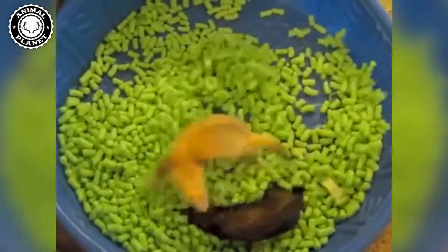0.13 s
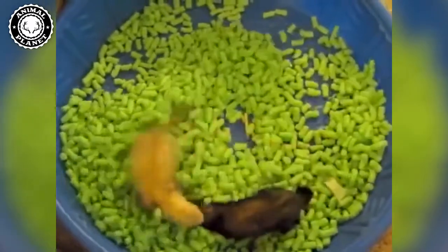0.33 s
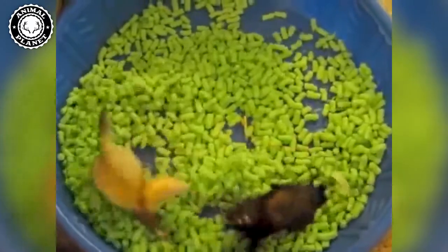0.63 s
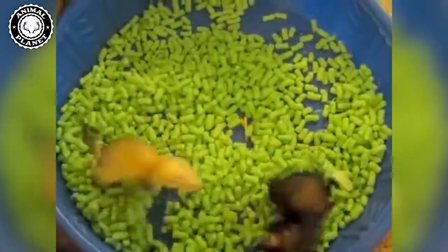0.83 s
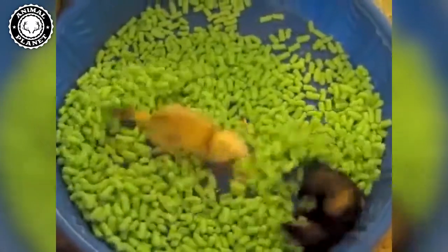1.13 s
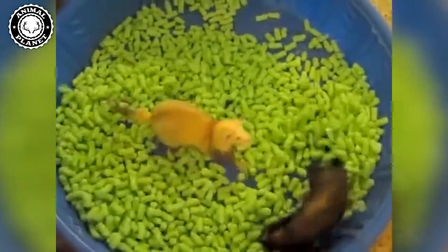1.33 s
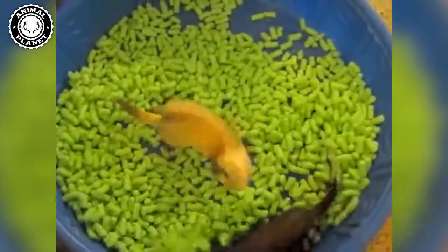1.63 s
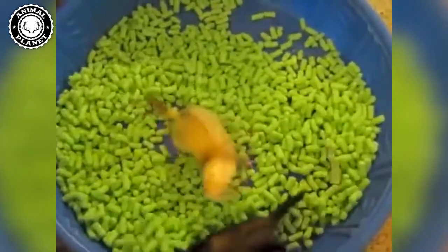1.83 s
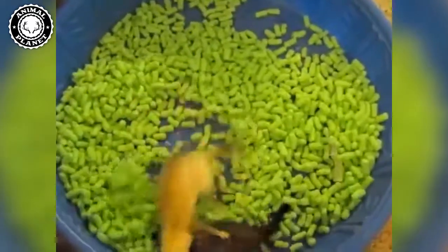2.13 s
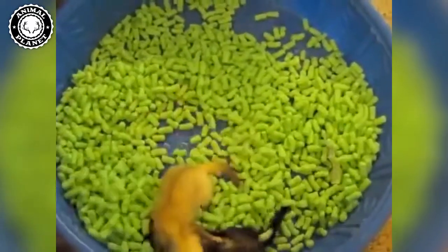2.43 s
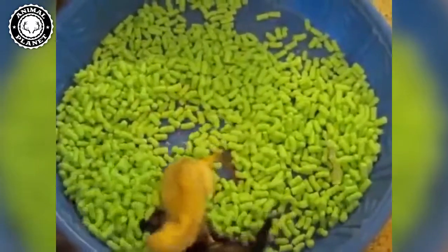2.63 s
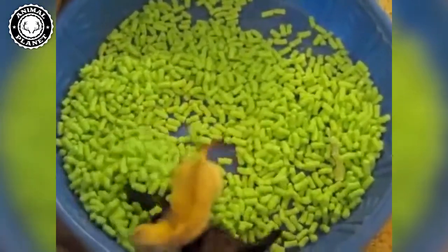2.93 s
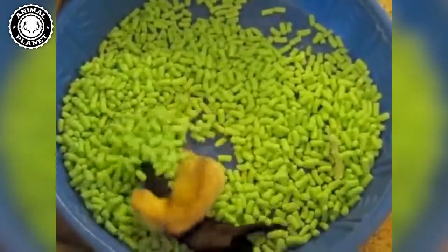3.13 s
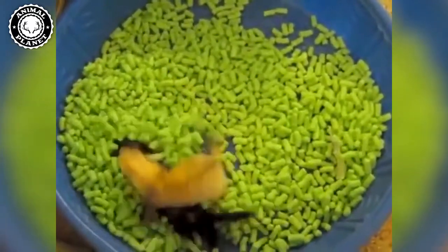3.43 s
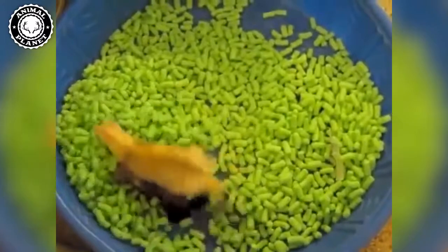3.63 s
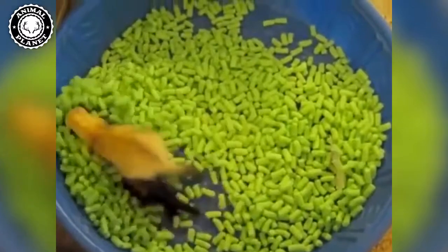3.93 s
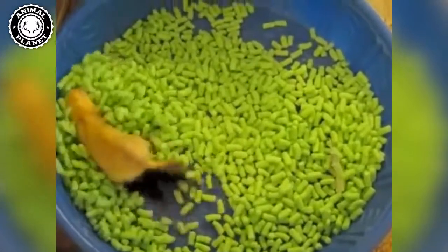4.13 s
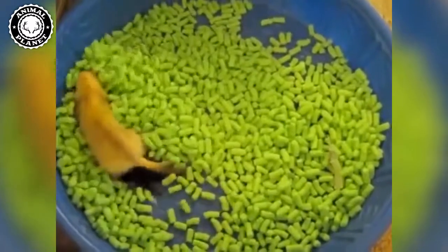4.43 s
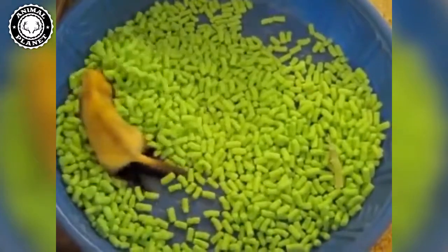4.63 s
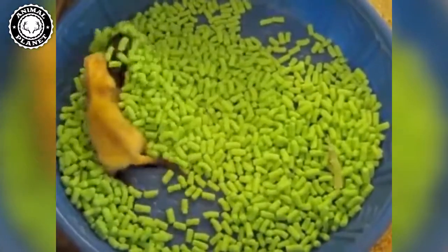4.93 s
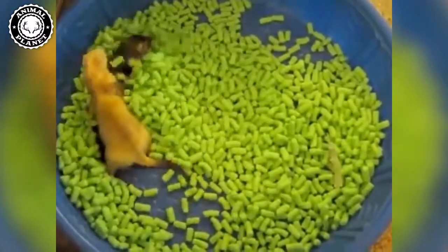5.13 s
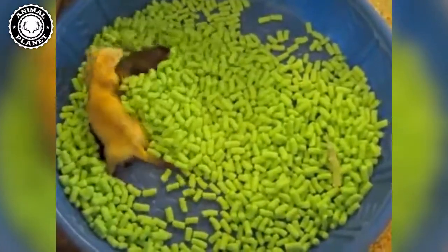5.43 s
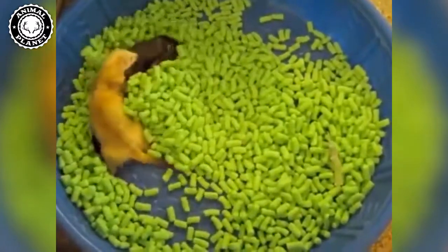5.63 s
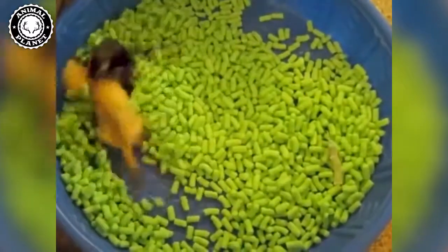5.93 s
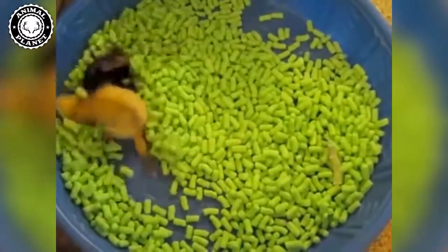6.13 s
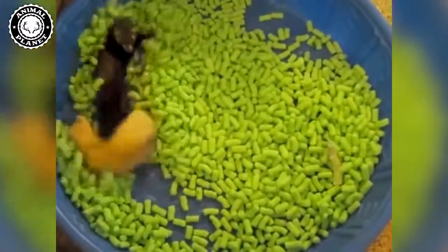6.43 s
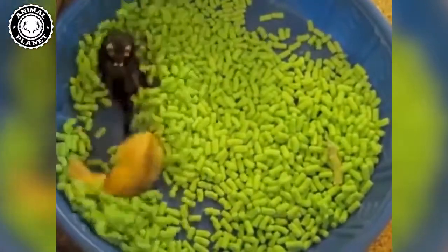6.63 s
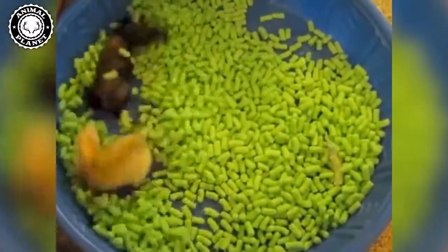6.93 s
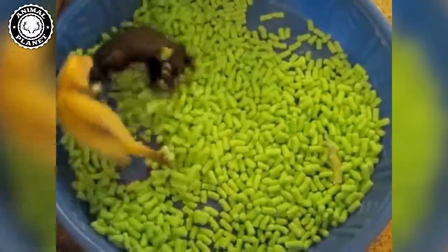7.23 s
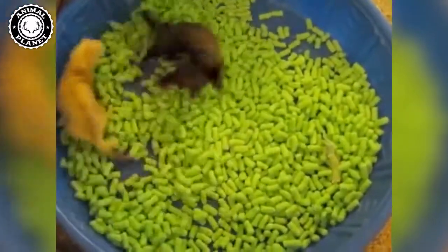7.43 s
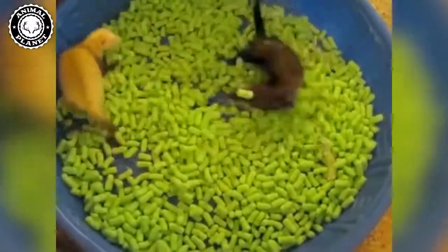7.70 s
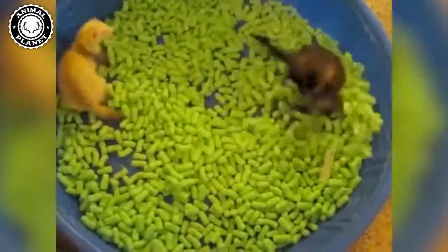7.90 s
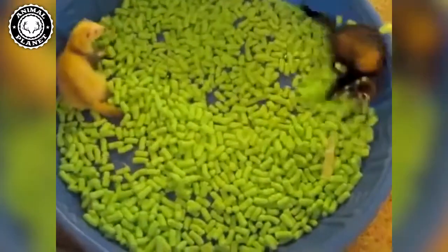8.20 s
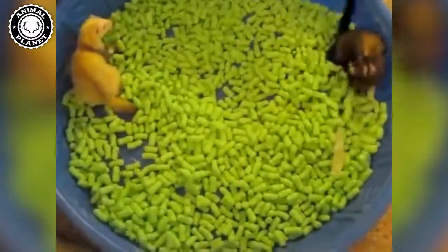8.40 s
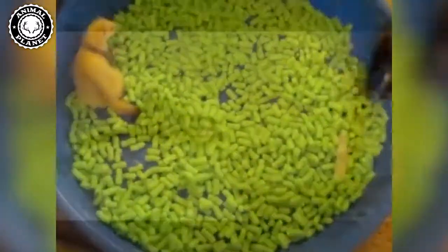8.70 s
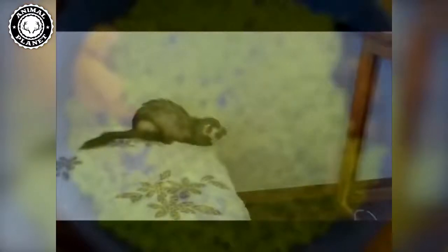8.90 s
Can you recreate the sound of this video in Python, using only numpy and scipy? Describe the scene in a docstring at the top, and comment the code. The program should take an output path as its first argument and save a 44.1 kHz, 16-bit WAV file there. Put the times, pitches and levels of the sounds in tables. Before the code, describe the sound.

Close-up foam rustling: bright dry scraping over hollow light tumbling, pushed in uneven bursts by scrambling ferrets. Early strong knocks and small squeaks give way to crackly burrowing, then heavier bumps on the plastic tub midway, more scrambling and a short rub along the wall near the end. Small room with a short reverb, limited treble, faint rumble, and finally faint hum and hiss. No animal calls.

```python
"""In a small room, two ferrets scramble and burrow through foam packing peanuts in a plastic tub.
Dense grains of noise and short rings make the scraping and tumbling heap; pushes and brief halts shape its level.
Over it come hollow taps of damped modes, crackling runs of slips, gliding squeaks, a rub along the wall,
and landings that boom on the tub's floor and rattle its wall. A short noise-tail reverb surrounds it all.
At the very end a low hum, a low drone and hiss fade in."""
import sys
import numpy as np
from scipy import signal
from scipy.fft import rfft, irfft, next_fast_len
from scipy.io import wavfile
from scipy.ndimage import uniform_filter1d, map_coordinates

SR = 44100
rng = np.random.default_rng(int(sys.argv[2]) if len(sys.argv) > 2 else 0)


def store_wav(level_fs):
    """Save 16-bit WAV to argv[1]."""
    pcm = np.round(np.clip(np.atleast_2d(level_fs), -1, 1) * 32767)
    wavfile.write(sys.argv[1], SR, pcm.T.astype(np.int16))


N = 399546

# peanuts kicked against their neighbours or the tub: (time [s], level [dB], pitch [Hz])
KICKS = [(0.034, -20, 1080), (0.286, -9, 1035), (0.3, -10, 1065), (0.363, -13.5, 930), (0.389, -8, 1080),
         (0.595, -17, 940), (0.711, -19, 1015), (0.73, -24, 970), (0.801, -19, 930), (0.897, -20.5, 1150),
         (1.02, -14.5, 650), (1.046, -18, 527), (1.081, -14, 736), (1.101, -11.5, 920), (1.106, -16, 1060),
         (1.128, -20, 880), (1.181, -18, 644), (1.432, -29, 1150), (1.871, -27, 1370), (2.018, -21.5, 960),
         (2.132, -20, 895), (2.14, -15, 810), (2.15, -15, 700), (2.179, -14.5, 1000), (2.195, -16.5, 810),
         (2.228, -16, 890), (2.238, -17, 1150), (2.247, -17, 980), (2.41, -17.5, 1020), (2.614, -14, 1260),
         (2.666, -16.5, 810), (2.734, -24, 726), (3.071, -18.5, 1116), (3.206, -20.5, 1320),
         (3.383, -13.5, 1136), (3.545, -15, 1130), (3.711, -17, 1110), (3.93, -15, 1040),
         (4.025, -16, 1100), (4.082, -15, 574), (4.244, -32, 920), (4.334, -23.5, 689),
         (4.602, -11.5, 1410), (4.706, -17.5, 1400), (4.837, -25.5, 870), (5.143, -22.5, 800),
         (5.316, -23, 1030), (5.497, -18, 1196), (5.723, -16, 514), (5.977, -11.5, 1300),
         (6.122, -18.5, 640), (6.18, -25, 900), (6.438, -26, 610), (6.502, -23, 781), (6.916, -18, 1020),
         (7.031, -14.5, 1100), (7.04, -13.5, 945), (7.247, -19, 910), (7.354, -15, 625), (7.58, -19, 1280),
         (7.603, -18, 1260), (7.653, -22.5, 1230), (7.805, -22, 1320), (7.888, -21.5, 1230),
         (7.997, -20, 756), (8.012, -16, 935), (8.358, -29, 948), (8.476, -17, 1290), (8.512, -15, 1240),
         (8.694, -19, 524), (8.71, -29, 1280), (8.747, -19, 1290), (8.893, -24, 960)]
# foam sticks and slips, in a tick or a longer crunch: (time [s], level [dB], pitch [Hz], length [s])
STICK_SLIPS = [(0.004, -19, 3590, 0.0057), (0.1141, -18, 1710, 0.028), (0.2527, -20, 3250, 0.0072),
               (0.388, -22, 3280, .006), (0.4604, -22, 2630, 0.0099), (0.731, -27, 3330, 0.0022),
               (0.895, -18.5, 2400, 0.016), (1.047, -16.5, 1770, 0.0095), (1.181, -19, 3400, .002),
               (1.2561, -15, 2700, 0.0024), (1.285, -19, 3820, 0.0023), (1.4355, -25.5, 2830, 0.0089),
               (1.464, -24.5, 4830, 0.0066), (1.642, -20, 3200, 0.0037), (1.669, -16, 3230, 0.0023),
               (1.794, -22, 2620, 0.0049), (1.8698, -12.5, 1970, 0.0025), (1.8965, -20, 4230, 0.0035),
               (1.9114, -22.5, 3310, 0.0041), (2.153, -21, 4000, 0.0086), (2.2594, -27, 4450, .006),
               (2.4109, -23, 4660, .005), (2.4717, -23, 4260, 0.0036), (2.484, -21, 3890, 0.0036),
               (2.5309, -20, 3400, .005), (2.6155, -17.5, 2800, 0.012), (2.6657, -22.5, 3500, 0.0063),
               (2.9204, -22, 4640, 0.0055), (2.9344, -20, 4540, 0.0027), (2.9937, -21, 4370, 0.0063),
               (3.02, -20, 4200, .001), (3.1638, -22, 5300, 0.0014), (3.1981, -20, 4030, 0.009),
               (3.527, -15, 3300, 0.0032), (3.714, -22, 2760, 0.0044), (3.7793, -16.5, 3200, 0.0014),
               (3.802, -24, 3460, .001), (3.9308, -19.5, 3180, 0.0061), (4.0255, -17, 3670, 0.0036),
               (4.4298, -24, 3200, 0.0044), (4.535, -17, 3130, 0.0067), (4.552, -19, 2650, 0.0046),
               (4.6024, -27, 1890, .002), (4.6743, -23.5, 2460, .005), (4.7051, -13, 2100, 0.0043),
               (4.7118, -14.5, 4300, 0.0031), (4.838, -24, 1830, 0.011), (5.003, -20, 4000, 0.0018),
               (5.165, -23, 4200, 0.0086), (5.237, -21, 3400, 0.0063), (5.2985, -17.5, 3780, 0.003),
               (5.3065, -21, 4300, .002), (5.3154, -18, 3000, 0.0025), (5.3707, -22, 4480, .002),
               (5.4665, -19, 2870, 0.0058), (5.4945, -14.5, 3450, 0.0038), (5.504, -14.5, 2860, 0.009),
               (5.5777, -23, 3070, 0.011), (5.7601, -19.5, 3750, 0.021), (5.866, -18, 2950, 0.012),
               (5.931, -21, 3800, .005), (6.054, -19.5, 2930, 0.0054), (6.1805, -14, 2900, .003),
               (6.4186, -16.5, 4050, 0.0035), (6.4556, -20.5, 3660, 0.0045), (6.4994, -24, 3240, 0.0033),
               (6.661, -22.5, 3050, 0.0031), (6.74, -26, 2770, .006), (6.8886, -16, 3300, 0.0087),
               (6.914, -17.5, 3780, 0.0069), (7.0424, -21.5, 3700, 0.012), (7.19, -17, 2760, 0.0043),
               (7.2454, -17, 3360, 0.0034), (7.388, -13, 2940, 0.0064), (7.601, -16, 2500, 0.0097),
               (7.722, -22, 3880, 0.0033), (7.93, -23, 2560, 0.0076), (7.9993, -18, 2400, 0.0029),
               (8.0134, -20, 4170, 0.002), (8.0681, -21, 2980, 0.0089), (8.1519, -20, 2030, 0.013),
               (8.287, -19, 2200, 0.0076), (8.2966, -17, 2300, 0.0097), (8.3584, -20.5, 1970, 0.0026),
               (8.477, -25, 2810, .004), (8.5044, -21, 2940, 0.0057), (8.7485, -15, 2380, 0.002),
               (8.86, -22.5, 2720, 0.012), (8.9024, -24, 2080, 0.002)]
# a body lands and scrabbles for a hold: (time [s], level [dB], scrabbling [s], floor over wall [dB])
LANDINGS = [(0.379, -39, 0.049, 9), (0.74, -41, 0.04, 8.5), (1.078, -30, 0.13, 3), (1.769, -33.5, .03, -5),
            (3.771, -36, 0.024, 5), (3.983, -36, .03, 2), (4.08, -23.5, 0.046, -6), (5.714, -21, 0.05, 0),
            (5.995, -22.5, .06, 6), (6.105, -25, 0.024, 7.5), (6.156, -26, 0.011, -7),
            (6.25, -29, 0.06, -7), (6.567, -33.5, 0.25, -9), (7.049, -32.5, 0.13, 4.5),
            (7.353, -46, 0.031, 15), (8.151, -32, 0.082, 6), (8.714, -29, .06, 1)]
# colour of a soft blow through foam: (frequency [Hz], level [dB])
SOFT_BLOW = [(40, -36.5), (75, -7), (100, -5), (140, 2), (300, -3.5), (700, 2), (1500, -33)]

FLOOR_HZ, FLOOR_WIDTH_HZ = 117.1, 31  # the drum mode of the tub's floor
SAG_DB_PER_S = 0.5  # a push slackens while it lasts


def amp(db):
    """Decibels to gain."""
    return 10 ** (np.asarray(db) / 20)


def unit(x):
    """Scaled to rms 1."""
    return x / np.sqrt(np.mean(x ** 2) + 1e-20)


def along(points, hz):
    """(Hz, value) points, interpolated on a log frequency axis."""
    f, v = np.transpose(points)
    return np.interp(np.log(hz + 1), np.log(f + 1), v)


def curves(rows):
    """One value per sample for each column after the time."""
    s, *cols = np.transpose(rows)
    return [np.interp(np.arange(N) / SR, s, c) for c in cols]


def add(track, s, sound):
    """Mix a sound into a track from time s on."""
    part = track[max(round(s * SR), 0):][:len(sound)]
    part += sound[:len(part)]


def filtered(x, response):
    """x times a complex response of frequency."""
    size = next_fast_len(len(x) + SR // 4)
    spectrum = rfft(x, size) * response(np.fft.rfftfreq(size, 1 / SR))
    return irfft(spectrum, size)[:len(x)]


def coloured(x, spectrum):
    """x through a spectrum of (Hz, dB) points, at rms 1."""
    return unit(filtered(x, lambda hz: amp(along(spectrum, hz))))


def resonance(f, hz, width):
    """Causal response of one mode."""
    return 1j * f * width / (hz * hz - f * f + 1j * f * width)


def heap(scraping, tumbling):
    """The stirred heap: bright scraping, hollow tumbling, and the tub drumming underneath."""
    # bright scraping: (frequency [Hz], level [dB])
    scrape_colour = [(400, -33.5), (1100, -2), (1700, -2.5), (2400, 4), (3300, 1.5), (4400, 2.5),
                     (5000, -0.5), (6000, -25.5)]
    # hollow tumbling: (frequency [Hz], level [dB])
    tumble_colour = [(80, -35.5), (200, -14.5), (350, -5.5), (520, -2), (800, -2), (1100, -1), (1400, -3.5),
                     (1800, -9.5), (3000, -10), (6000, -44.5)]
    slide = clumps(rate=110, depth_db=0.07) * jams()

    ticks = grains(count=20000, low_hz=1210, high_hz=5985, life=0.0028, spread_db=2.1, cap=5)
    chirps = grains(count=2000, low_hz=2926, high_hz=5210, life=0.042, spread_db=1.5, cap=3.8)
    deep_hiss = rng.standard_normal(N)  # deep in the heap the contacts merge into a soft hiss
    scrape = coloured(ticks + amp(-5.5) * chirps + amp(-4) * deep_hiss, scrape_colour)
    scrape = patchy(scrape, depth_db=0.8)

    knocks = grains(count=13000, low_hz=214, high_hz=2018, life=0.0093, spread_db=1.0, cap=7.4)
    tumble = patchy(coloured(knocks, tumble_colour), depth_db=1.5)
    foam = amp(-1.38) * scraping * scrape + amp(-1.32) * tumbling * tumble

    # tumbling peanuts and scrabbling paws drive the wall and the floor; their powers add
    patter = coloured(rng.standard_normal(N), SOFT_BLOW)
    wall_paws, floor_paws = np.zeros(N), np.zeros(N)
    for s, db, length, floor_db in LANDINGS:
        push = amp(db) * stroke(s, length, -SAG_DB_PER_S, release_t60=0.15)
        wall_paws += push
        floor_paws += push * amp(floor_db)
    wall = np.hypot(amp(-11.5) * tumbling, amp(-13) * wall_paws)
    # foam cushions the floor, which follows the tumbling by only 0.58 dB per dB
    floor = np.hypot(amp(-38.5) * tumbling ** 0.58, amp(-18) * floor_paws)
    drumming = wall * unit(tub(patter)) + floor * unit(tub_floor(patter))
    return slide * foam + halts() * drumming


def stirring():
    """Gains of scraping and tumbling: strokes add their power to the burrowing, which dips after each."""
    # a paw or snout shoves through the heap:
    # (start [s], length [s], scraping level [dB], tumbling over scraping [dB])
    shoves = [(0.118, 0.062, -41, 5), (0.236, 0.018, -30, 0.5), (0.29, 0.11, -32.5, 0.5),
              (0.428, 0.038, -38, 0), (0.551, 0.056, -36, 0), (0.727, 0.13, -42, 4),
              (0.89, 0.096, -37.5, -1.5), (1.001, 0.13, -29.5, 3), (1.147, 0.1, -32, 0.5),
              (1.427, 0.041, -46, 5), (1.493, 0.13, -50, 3), (1.613, 0.084, -33, -1.5),
              (1.717, 0.16, -39.5, -2), (2.123, .13, -30, -1), (2.388, 0.26, -37.5, -6.5),
              (2.664, 0.25, -39, -3.5), (2.902, 0.15, -34, -8.5), (3.37, 0.12, -32.5, -5),
              (3.496, 0.081, -32, 0.5), (3.72, 0.058, -35.5, 1), (3.929, 0.17, -36.5, 0.5),
              (4.07, 0.054, -34, 8), (4.136, 0.24, -40, -4), (4.45, 0.13, -30, -10), (4.542, 0.11, -41, 7),
              (4.84, 0.031, -48, 10.5), (4.967, 0.16, -41, -18), (5.148, 0.096, -36.5, -2),
              (5.275, 0.039, -35.5, -4.5), (5.39, 0.07, -36, -5), (5.495, 0.029, -32.5, -15),
              (5.721, 0.084, -34, 2), (5.842, 0.12, -30, -3.5), (5.971, 0.017, -33, 7.5),
              (6.009, 0.19, -31, -3.5), (6.286, 0.026, -31.5, -28), (6.42, 0.1, -39.5, 3),
              (6.552, 0.19, -44.5, 9.5), (6.82, 0.15, -34.5, -1.5), (7.008, 0.12, -31.5, 3),
              (7.155, 0.093, -30, -3.5), (7.291, 0.11, -30.5, 2.5), (7.402, 0.043, -44, 10),
              (7.575, 0.14, -36.5, -6), (7.873, 0.14, -37, -1), (7.965, 0.14, -43, 10),
              (8.142, 0.15, -33, 3.5), (8.344, 0.12, -38.5, -0.5), (8.482, 0.02, -45.5, 12.5),
              (8.71, 0.093, -39.5, 2.5), (8.84, 0.1, -37.5, -9.5)]
    # restless burrowing between the strokes: (time [s], scraping level [dB], tumbling over scraping [dB])
    burrowing = [(0, -35.5, 0), (1.0, -36, -2.5), (1.4, -41.5, -1.5), (1.6, -39, -3.5), (1.98, -41.5, -2.5),
                 (2.3, -36, -1), (3.1, -42, -1), (3.6, -33, -2.5), (3.87, -36, -5), (4.35, -32, -2.5),
                 (4.8, -37, -5.5), (5.6, -35.5, -5.5), (6.4, -36.5, -3.5), (7.25, -36, -3),
                 (7.77, -37, 1.5), (8.3, -35, 0), (8.66, -38.5, 0), (9.06, -40, 2.5)]
    rest_s, rest_db = 0.069, -1  # the pause after each stroke
    rest = sum(stroke(s + length, rest_s, 0) for s, length, *_ in shoves)
    burrow_db, hollow_db = curves(burrowing)
    burrow_db = burrow_db + rest_db * np.minimum(rest, 1)
    scraping_power = amp(burrow_db) ** 2
    tumbling_power = amp(burrow_db + hollow_db) ** 2
    for s, length, db, tumble_db in shoves:
        push = amp(db) * stroke(s, length, -SAG_DB_PER_S)
        scraping_power = scraping_power + push ** 2
        tumbling_power = tumbling_power + (amp(tumble_db) * push) ** 2
    return np.sqrt([scraping_power, tumbling_power]) * halts()


def stroke(start, length, slope_db, release_t60=0.25):
    """Gain of one push: a quick rise, a hold that slopes by slope_db a second, then the peanuts settle."""
    attack_s = 0.02
    gain, t = np.zeros(N), np.arange(int((length + release_t60) * SR)) / SR
    hold_db = slope_db * np.minimum(t, length)
    release_db = -60 * np.maximum(t - length - attack_s / 2, 0) / release_t60
    add(gain, start - attack_s / 2, np.minimum(t / attack_s, 1) * amp(hold_db + release_db))
    return gain


def halts():
    """Gain of the stirring: it dips fast when the animals stop and is back when they move."""
    # both animals stop: (start [s], length [s], dip [dB])
    stops = [(0.642, .06, -4.5), (1.294, 0.14, -2.5), (1.916, 0.16, -2.5), (3.015, 0.046, -8),
             (3.809, 0.12, -4.5), (4.726, 0.15, -2.5), (6.192, 0.03, -7.5), (6.53, 0.033, -7.5),
             (7.724, 0.12, -4), (8.65, 0.037, -4.5), (9.02, 0.045, -6)]
    edge_s = 0.0062  # how fast they stop and start again
    dips = []
    for s, length, db in stops:
        corners = [(s - edge_s, 0), (s, db), (s + length - edge_s, db), (s + length, 0)]
        dips.append(curves(corners)[0])
    return amp(sum(dips))


def jams():
    """The heap jams for a moment before a peanut breaks loose: a gain that dips, then jumps back."""
    jam_s, jam_db = 0.025, -0.8
    jam, ramp = np.zeros(N), np.linspace(0, 1, int(jam_s * SR))
    for s, *_ in list(KICKS) + list(STICK_SLIPS):
        add(jam, s - jam_s, ramp)
    return amp(jam_db * np.minimum(jam, 1))


def clumps(rate, depth_db):
    """Contacts come in little avalanches: a quickly changing gain of rms 1, with rate knots a second."""
    knots = rng.standard_normal(N // 50)
    return unit(amp(depth_db * map_coordinates(knots, [np.arange(N) * rate / SR], mode="wrap")))


def grains(count, low_hz, high_hz, life, spread_db, cap):
    """Tiny contacts at random times, each a damped ring of its own pitch and size; rms 1."""
    when, tone, size, sign = rng.random((count, 4)).T
    t = np.arange(min(int(life * SR), 5000000 // count)) / SR  # the second bound limits memory
    # exponential spread in dB: many small contacts, a few strong ones
    strength = np.sign(sign - 0.5) * amp(abs(spread_db) * np.minimum(-np.log(1 - size), cap))
    pitch = low_hz + (high_hz - low_hz) * tone
    rings = strength[:, None] * np.sin(2 * np.pi * pitch[:, None] * t) * amp(-60 * t / life)
    where = (when * N).astype(int)[:, None] + np.arange(len(t))
    return unit(np.bincount(where.ravel(), rings.ravel(), N)[:N])


def patchy(x, depth_db, size=5):
    """Every group of peanuts has a colour of its own: a random gain over pitch and time."""
    z = signal.stft(x, nperseg=512)[2]
    field = uniform_filter1d(rng.standard_normal(z.shape), size, axis=0)
    field = uniform_filter1d(field, size, axis=1)
    return unit(signal.istft(z * amp(depth_db * unit(field)), nperseg=512)[1][:N])


def tub(x):
    """x drums on the modes of the tub's wall."""
    # the wall's modes: (frequency [Hz], width [Hz], level [dB])
    wall_modes = [(181.6, 53, -1.5), (271, 35, -3.5), (308.3, 21, 5.5), (371.6, 10, 3), (487, 130, -12)]
    return filtered(x, lambda f: sum(amp(db) * resonance(f, hz, width) for hz, width, db in wall_modes))


def tub_floor(x):
    """x drums on the tub's floor, which answers only close to its mode."""
    return filtered(x, lambda f: resonance(f, FLOOR_HZ, FLOOR_WIDTH_HZ) ** 2)


def strays(gain, count, over_db, spread_db, low_hz, high_hz):
    """Lesser contacts at random times, as strong as the heap is stirred: rows (s, dB, pitch Hz)."""
    when, size, tone = rng.random((count, 3)).T
    db = 20 * np.log10(gain[(when * N).astype(int)]) + over_db - spread_db * size
    return list(zip(when * N / SR, db, low_hz + (high_hz - low_hz) * tone))


def taps(rows, t60=0.016, second_db=-6, crack_db=-14, rise=0.0007, rebound_db=-9):
    """Each kicked peanut rings briefly in two damped modes, then knocks two neighbours."""
    track, t = np.zeros(N), np.arange(SR // 16) / SR
    fade = (1 - np.exp(-t / rise)) * amp(-60 * t / t60)
    for s, db, hz in rows:
        for order, (gap, detune, upper) in enumerate(rng.random((3, 3))):
            pitch = hz * (1 + 0.031 * order * (detune - 0.5))
            upper_pitch = pitch * (1.2 + 0.3 * upper)
            ring = np.sin(2 * np.pi * pitch * t) + amp(second_db) * np.sin(2 * np.pi * upper_pitch * t)
            tick = amp(crack_db) * rng.standard_normal(len(t))
            delay = rise + order * (0.0067 + 0.0039 * gap)
            add(track, s + delay, amp(db + 1.5 + order * rebound_db) * (ring + tick) * fade)
    return track


def snaps(rows, count=32, first_db=-4, later_db=-1, spread_db=9, crumble_db=-19, crumble_t60=0.091):
    """A sharp slip sets off a dense run of others, then crumbling; the peanut's resonance colours it all."""
    slips_per_s, top_hz = 1100, 5750
    width_share = 0.5  # width of the resonance as a share of its pitch
    track, t = np.zeros(N), np.arange(SR // 12) / SR
    for s, db, hz, length in rows:
        run = np.zeros(len(t))
        run[0] = amp(first_db)
        for order, (scatter, size, sign) in enumerate(rng.random((count, 3))):
            delay = (order + 0.5 + scatter) / slips_per_s
            slip = np.sign(sign - 0.5) * amp(later_db - spread_db * size)
            add(run, delay, [(delay < length) * slip])
        peanut = lambda f: resonance(f, hz, width_share * hz) * (f < top_hz)
        crack = filtered(run, peanut)
        crumbs = unit(filtered(rng.standard_normal(len(t)) ** 3, peanut))  # cubed noise is spiky
        settle = amp(crumble_db - 60 * np.maximum(t - length, 0) / crumble_t60)
        add(track, s, amp(db) * (crack / np.abs(crack).max() + crumbs * settle))
    return track


def thumps(t60=0.092, rise=0.022, wall_t60=0.01, boom_db=-9.0):
    """A soft body pushes on the tub through the foam: the floor booms and the wall rattles."""
    track, t = np.zeros(N), np.arange(SR // 3) / SR
    boom = np.sin(2 * np.pi * FLOOR_HZ * t) * (1 - np.exp(-t / rise)) * amp(-60 * t / t60)
    boom = boom / np.abs(boom).max()
    for s, db, _, floor_db in LANDINGS:
        blow = coloured(rng.standard_normal(len(t)), SOFT_BLOW) * amp(-60 * t / wall_t60)
        rattle = tub(blow)
        rattle = rattle / np.abs(rattle).max()
        add(track, s, amp(db + floor_db + boom_db) * boom + amp(db - 3) * rattle)
    return track


def rub(hz=2000, width_hz=800):
    """A flank judders peanuts along the wall, ever harder: dense slips in one broad resonance."""
    slips = grains(count=9000, low_hz=995, high_hz=3600, life=0.0025, spread_db=3, cap=3)
    press = amp(-41.5) * stroke(start=8.15, length=0.16, slope_db=67)
    return press * unit(filtered(slips, lambda f: resonance(f, hz, width_hz)))


def squeaks(rough=0.15, rough_hz=150, rise=0.011, fade_t60=0.04):
    """Rubbing foam squeaks: each squeak glides along one slightly rough note and dies away."""
    # squeaking rubs: (time [s], length [s], level [dB], starting pitch [Hz], glide [Hz per s])
    foam_squeaks = [(0.292, 0.026, -31, 1092, -1000), (0.375, 0.017, -28.5, 1042, 1498),
                    (0.707, 0.086, -39.5, 1013, -900), (8.722, 0.035, -32, 381, 2500),
                    (8.744, 0.03, -36, 1353, -7000)]
    track, t = np.zeros(N), np.arange(SR // 8) / SR
    for s, length, db, start_hz, glide in foam_squeaks:
        hz = start_hz + glide * np.minimum(t, length)
        judder = rough * map_coordinates(rng.standard_normal(64), [t * rough_hz], mode="wrap")
        gain = np.minimum(t / rise, 1) * amp(db - 60 * np.maximum(t - length, 0) / fade_t60)
        add(track, s, gain * unit(np.sin(2 * np.pi * np.cumsum(hz) / SR + judder)))
    return track


def room(x, count=30):
    """A short decaying noise reverb, its tail redrawn for each stretch to keep the colour even."""
    # reverberation: (frequency [Hz], time to fall by 60 dB [s])
    decay = [(100, 0.33), (1000, 0.49), (5000, 0.31)]
    track, edges = np.zeros(N), np.linspace(0, N, count + 1).astype(int)
    for start, end in zip(edges, edges[1:]):
        hz, t, z = signal.stft(rng.standard_normal(SR // 3), SR, nperseg=256)
        fade = amp(-60 * t / along(decay, hz)[:, None])
        tail = signal.istft(z * fade, SR, nperseg=256)[1]
        answer = signal.fftconvolve(x[start:end], tail / np.linalg.norm(tail))
        add(track, start / SR + 0.002513, answer)
    return track


def quiet_room(mains_hz=49.7, octave_db=-7, drone_db=-3, drone_hz=60, drone_width_hz=50):
    """A two-partial hum, a low drone of resonant noise about as strong as its main partial, and hiss fade in."""
    # the fade-in: (time [s], hum level [dB], hiss level [dB])
    fade_in = [(0, -120, -120), (8.66, -110, -100), (8.71, -55.5, -73.5), (8.82, -48, -62),
               (9.06, -45, -51.5)]
    # hiss: (frequency [Hz], level [dB])
    hiss_colour = [(30, 7), (500, -2.5), (3000, -9.5), (6000, -11), (15000, -13.5)]
    hum_db, hiss_db = curves(fade_in)
    phase = 2 * np.pi * mains_hz * np.arange(N) / SR
    drone = unit(filtered(rng.standard_normal(N), lambda f: resonance(f, drone_hz, drone_width_hz)))
    hum = unit(np.sin(phase) + amp(octave_db) * np.sin(2 * phase) + amp(drone_db) * drone)
    return amp(hum_db) * hum + amp(hiss_db) * coloured(rng.standard_normal(N), hiss_colour)


def scene(stray_length=0.0014):
    """The rustle in its room, heard through a narrow-band microphone, plus the quiet room."""
    # low background rumble: (frequency [Hz], level [dB])
    rumble_colour = [(20, -4), (35, -5.5), (50, -1.5), (70, -4.5), (110, -2), (300, 0.5), (1000, -16),
                     (5000, -12.5)]
    rustle_top_hz = 5090
    scraping, tumbling = stirring()
    stray_kicks = strays(tumbling, count=30, over_db=6.5, spread_db=5, low_hz=726, high_hz=1300)
    kicked = list(KICKS) + stray_kicks
    ticks = strays(scraping, count=220, over_db=0, spread_db=3.0, low_hz=2200, high_hz=4660)
    slipping = list(STICK_SLIPS) + [(*tick, stray_length) for tick in ticks]

    play = heap(scraping, tumbling) + rub() + squeaks() + taps(kicked) + snaps(slipping) + thumps()
    rumble = coloured(rng.standard_normal(N), rumble_colour)
    play = play + amp(-10.5) * room(play) + amp(-48.0) * rumble
    # a steep treble roll-off, 5 dB down at the rustle's top
    dull = filtered(play, lambda f: amp(-5 * np.minimum(f / rustle_top_hz, 1.5) ** 14))
    return (dull + quiet_room())[None]


def record(dry):
    """Nothing is kept above the band limit; the converter sits slightly off zero."""
    top_hz = 15800
    return filtered(dry[0], lambda hz: hz < top_hz)[None] - 0.004


dry = scene()
out = record(dry)
store_wav(out)
```